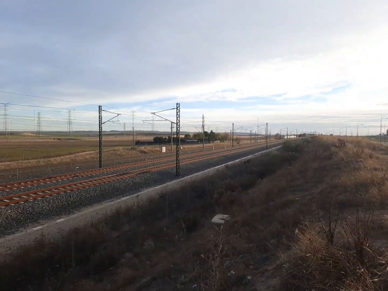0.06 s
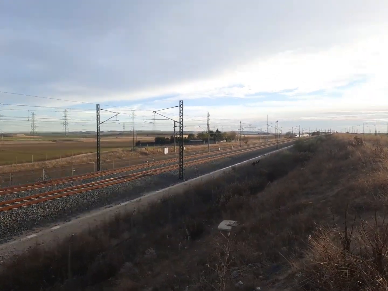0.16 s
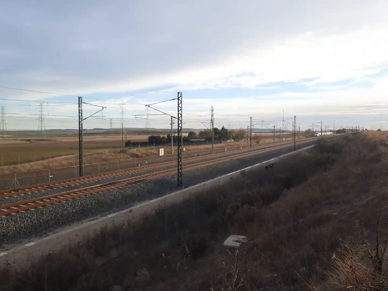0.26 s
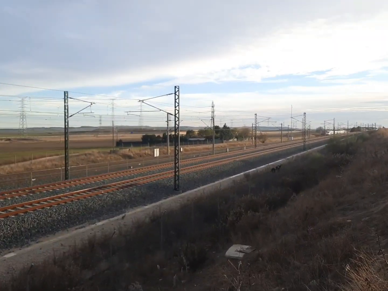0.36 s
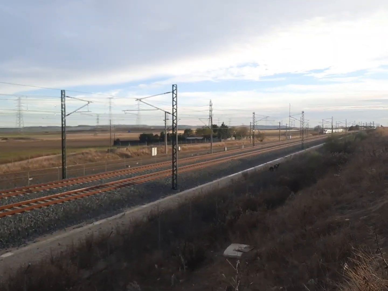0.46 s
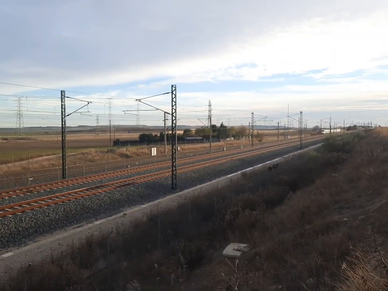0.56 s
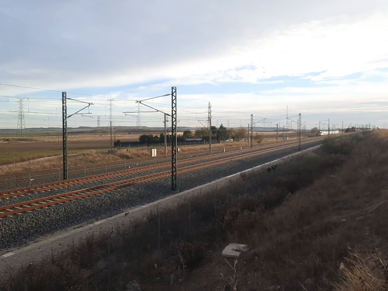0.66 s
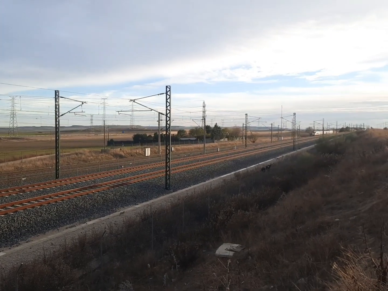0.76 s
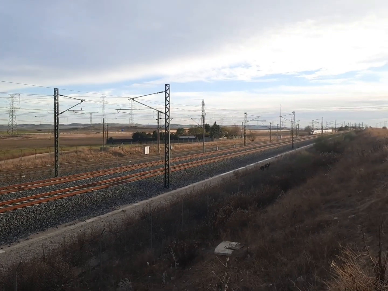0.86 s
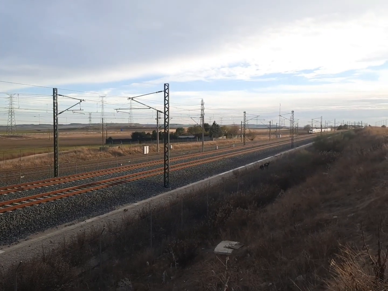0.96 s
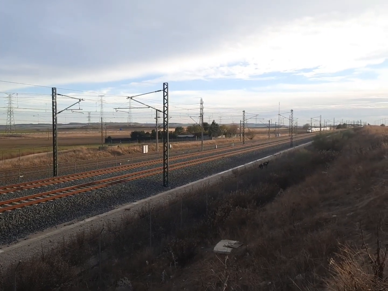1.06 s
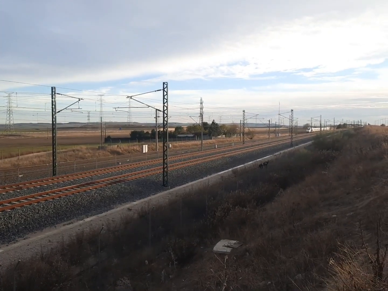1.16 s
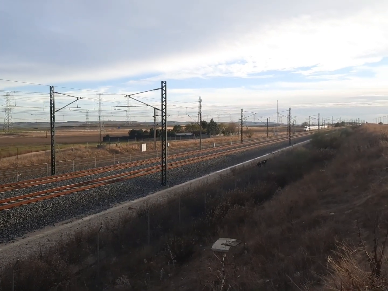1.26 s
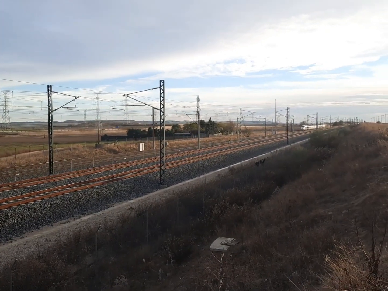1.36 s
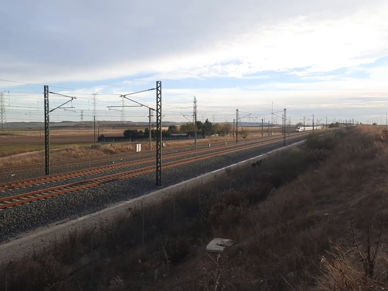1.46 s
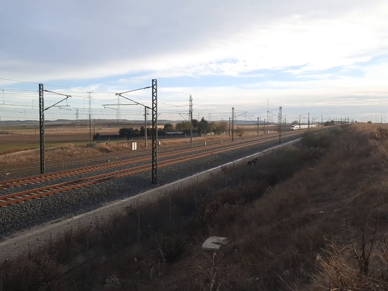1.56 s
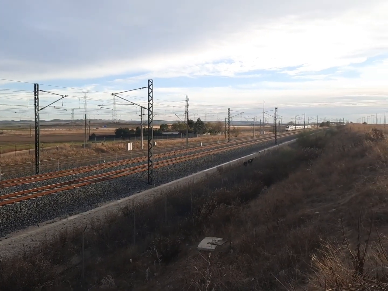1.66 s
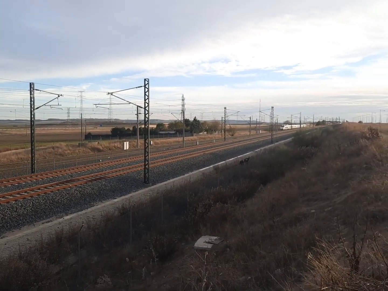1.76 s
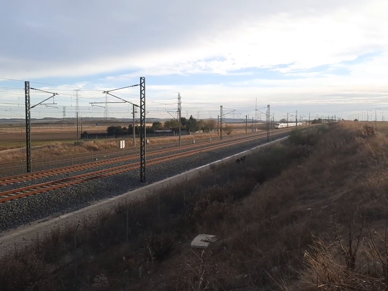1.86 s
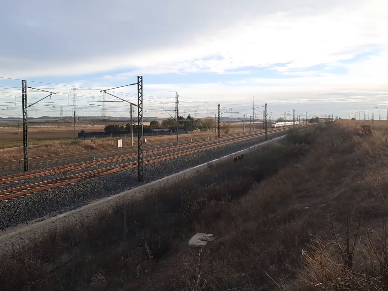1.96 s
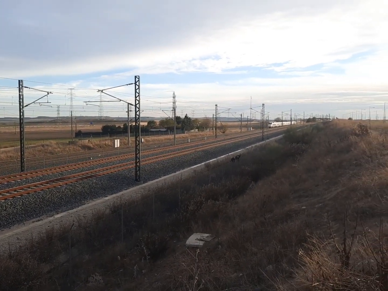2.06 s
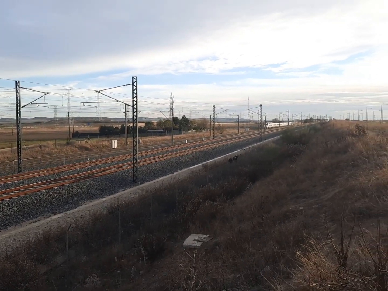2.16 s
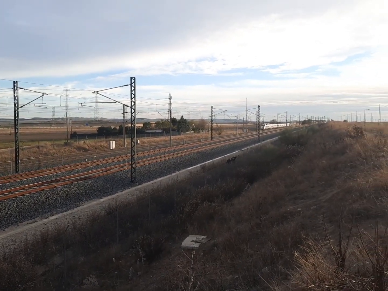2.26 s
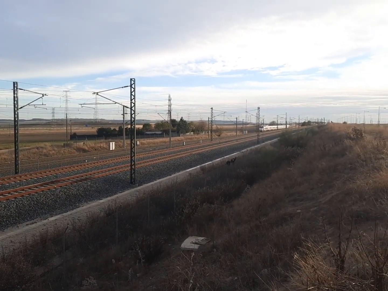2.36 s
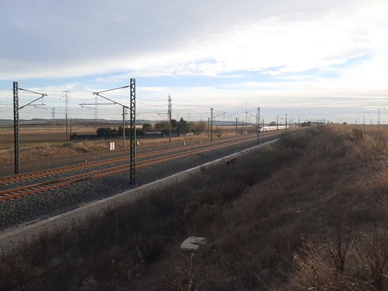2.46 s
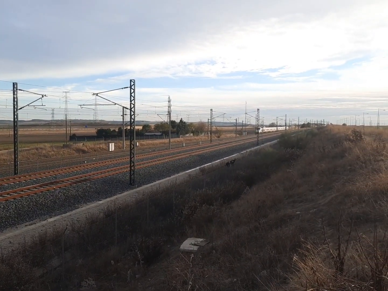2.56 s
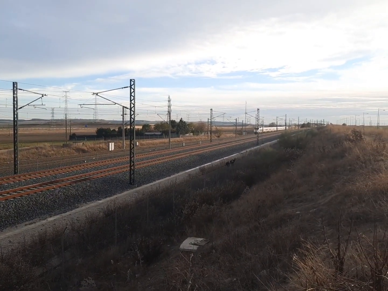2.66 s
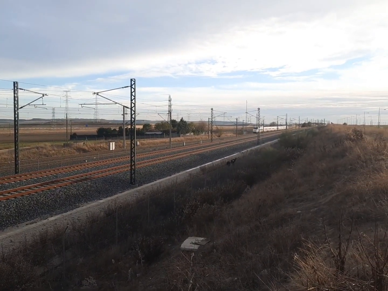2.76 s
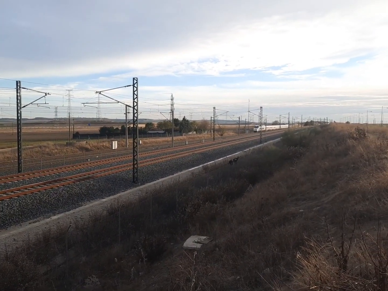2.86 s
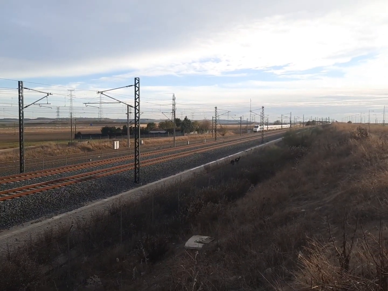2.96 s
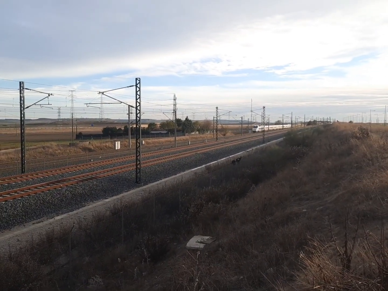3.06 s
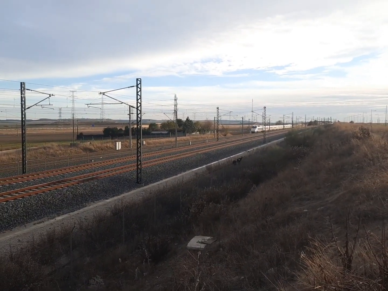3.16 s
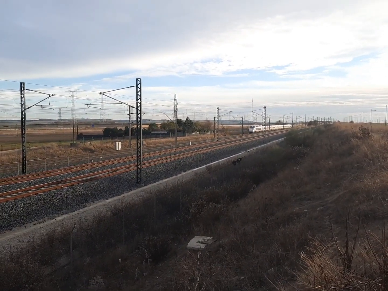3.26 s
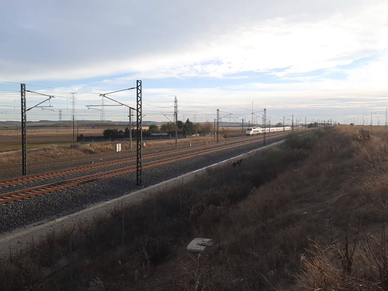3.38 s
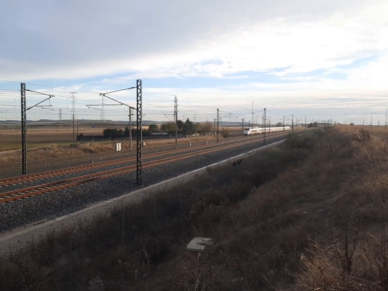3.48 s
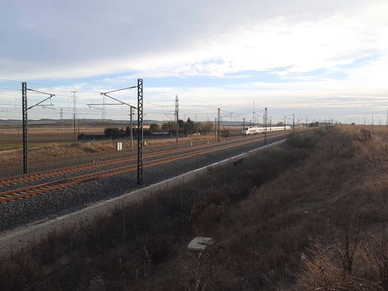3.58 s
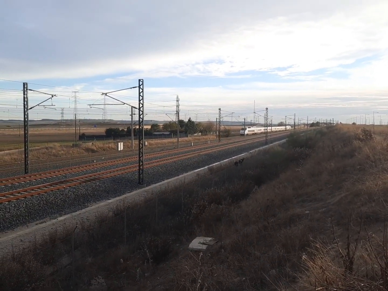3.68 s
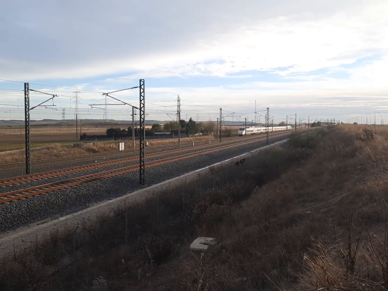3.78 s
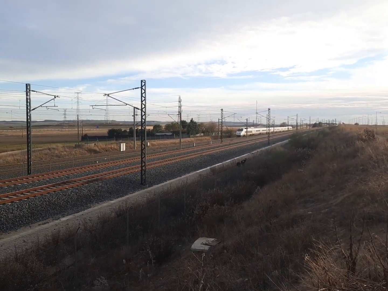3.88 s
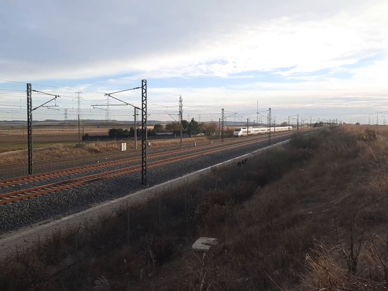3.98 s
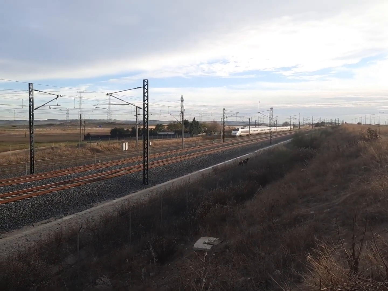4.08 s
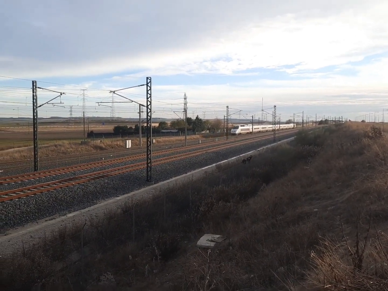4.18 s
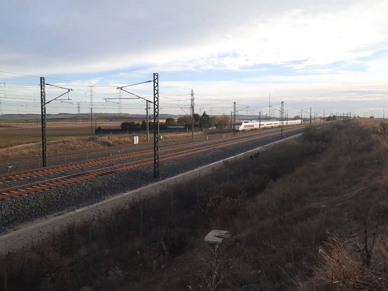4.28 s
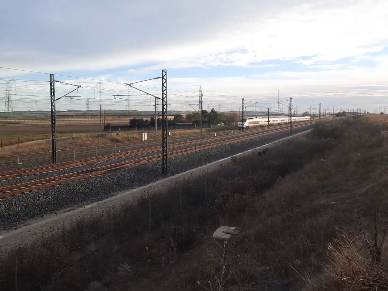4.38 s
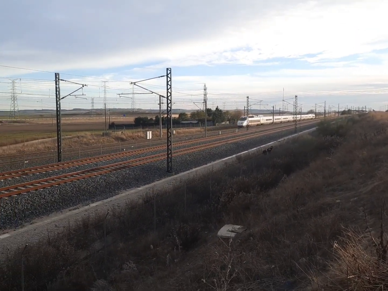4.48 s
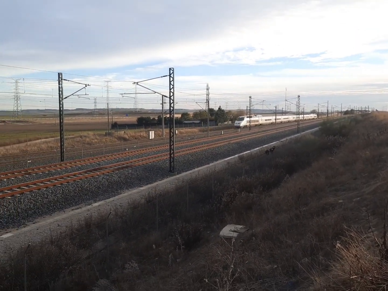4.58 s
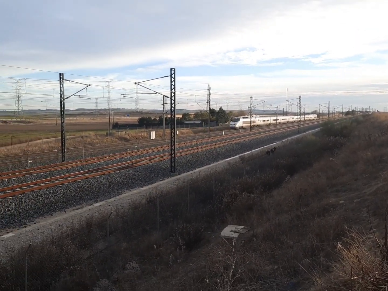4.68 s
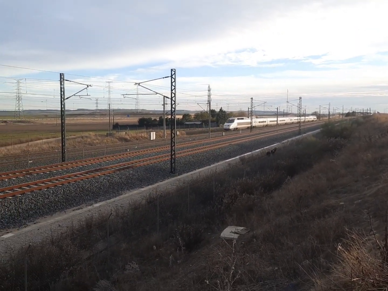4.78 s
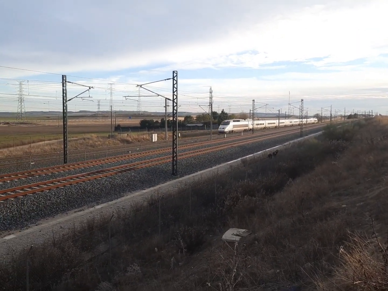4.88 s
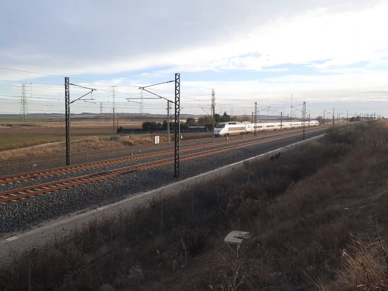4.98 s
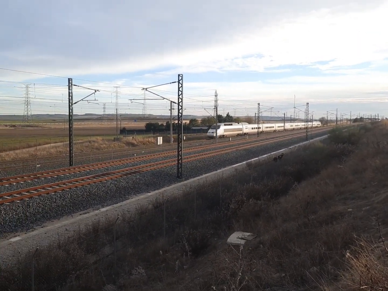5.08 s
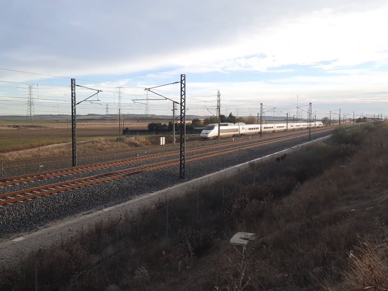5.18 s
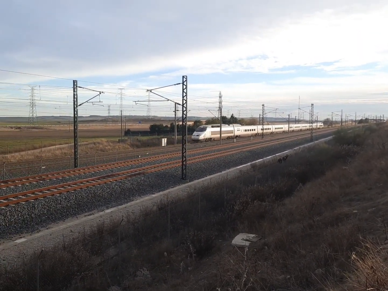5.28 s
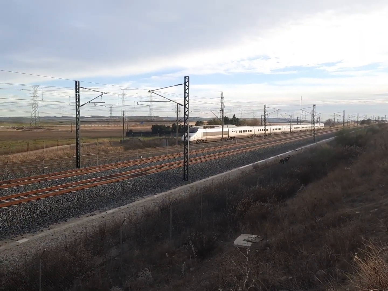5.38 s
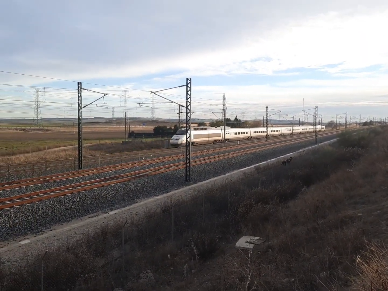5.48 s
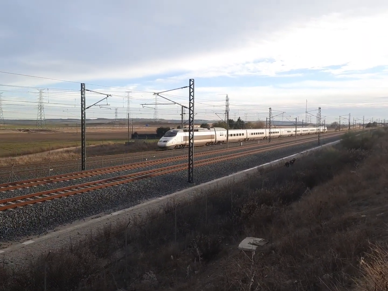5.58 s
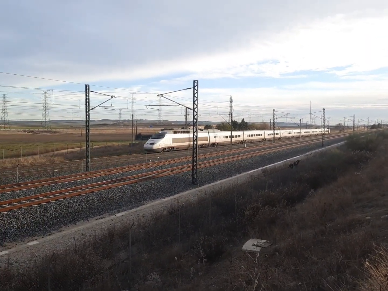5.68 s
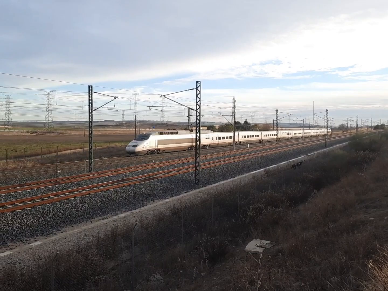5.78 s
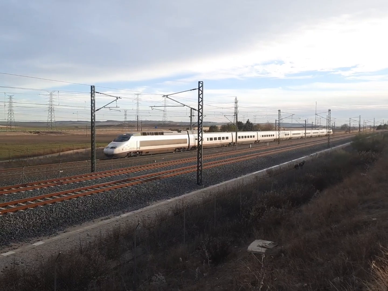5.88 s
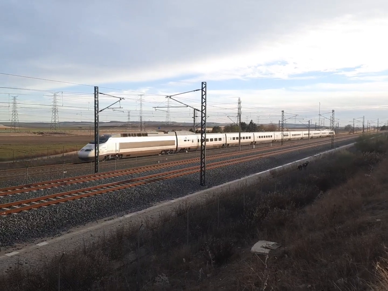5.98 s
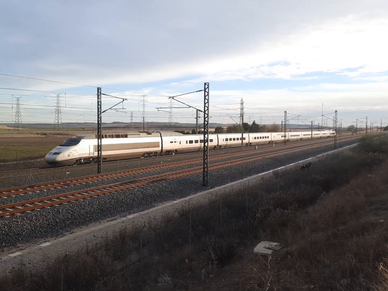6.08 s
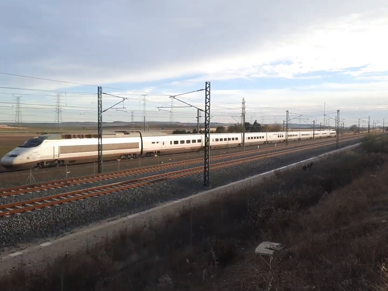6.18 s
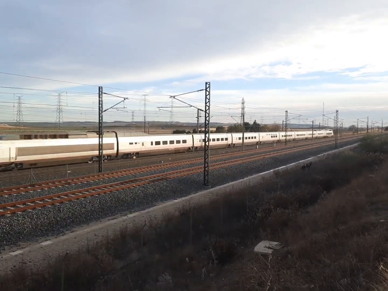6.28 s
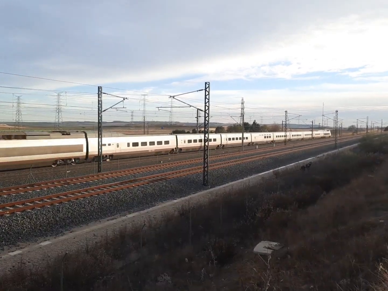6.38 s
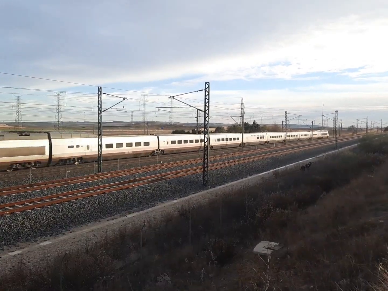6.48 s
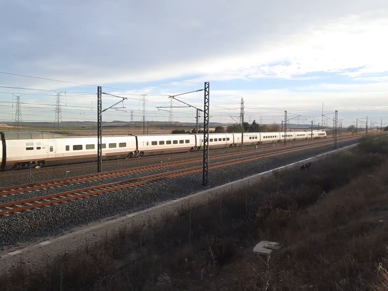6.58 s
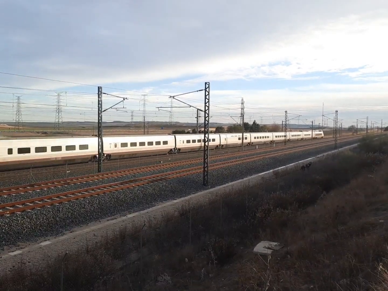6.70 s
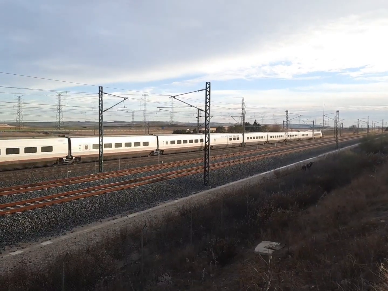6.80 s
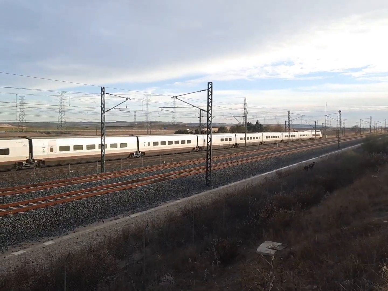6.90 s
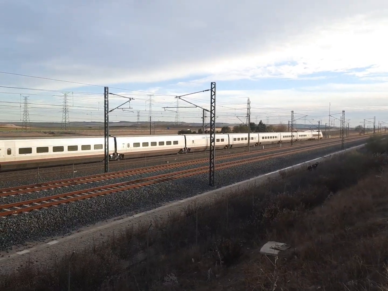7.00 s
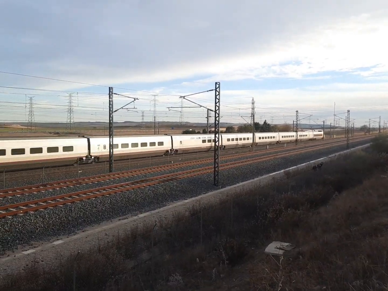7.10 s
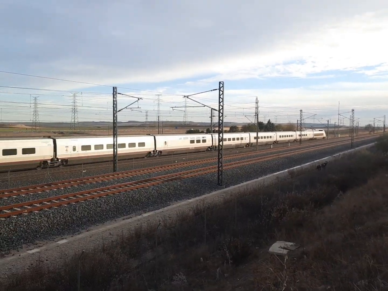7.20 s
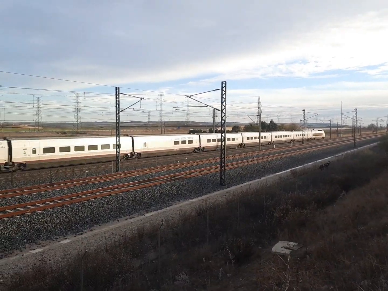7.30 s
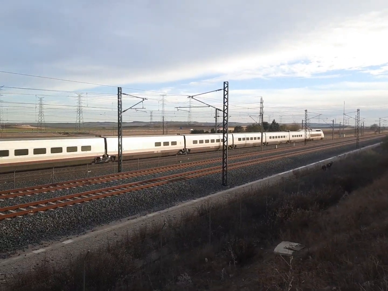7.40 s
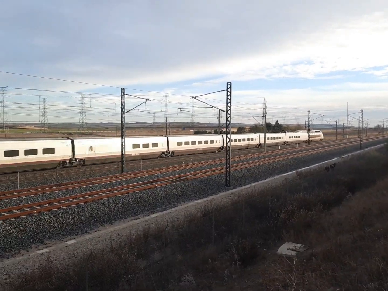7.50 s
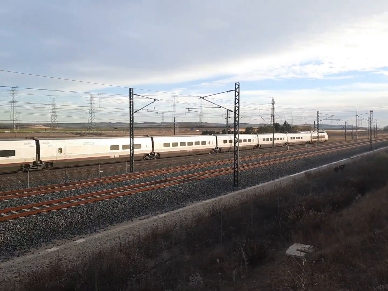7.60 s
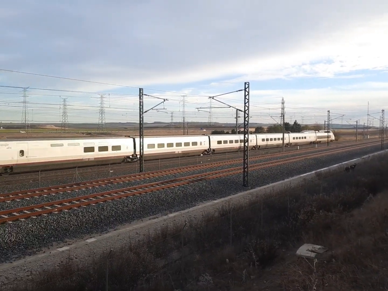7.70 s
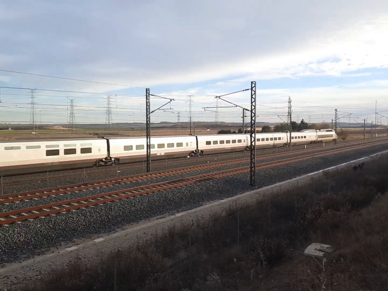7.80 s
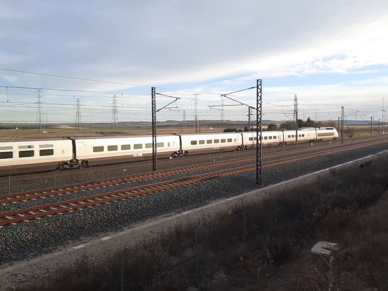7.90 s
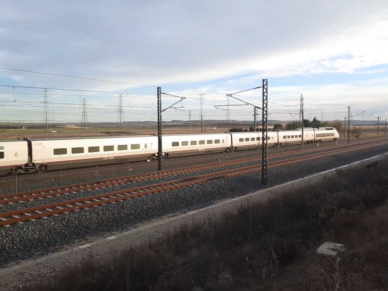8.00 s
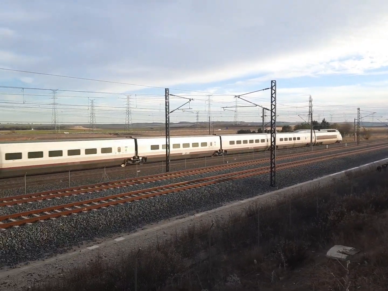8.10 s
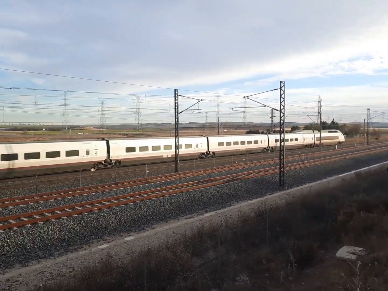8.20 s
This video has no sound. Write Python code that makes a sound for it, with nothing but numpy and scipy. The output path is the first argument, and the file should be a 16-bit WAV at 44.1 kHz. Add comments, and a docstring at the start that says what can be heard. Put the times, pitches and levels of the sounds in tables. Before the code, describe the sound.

A high-speed train approaches over quiet fields and sweeps past with rushing air, low rumble, wheel noise and falling motor whines.

```python
"""Open fields: a high-speed train comes out of the distance and runs past two microphones.
The rails sing ahead of it, then a low rumble and the rush of air round the nose swell. Wheels and
whining motors take over as it draws alongside. Far birds call in the quiet before, and the left
microphone hears the high treble best. The broad sounds are random noise, shaped by how much power
each frequency has at each moment; the motors and birds are rough, gliding tones."""
import sys
import numpy as np
from scipy import signal
from scipy.io import wavfile
from scipy.ndimage import uniform_filter1d

SR = 44100
rng = np.random.default_rng(int(sys.argv[2]) if len(sys.argv) > 2 else 0)


def wav_out(sig):
    """Save sig, one row per channel (or a flat mono array), as 16-bit PCM at SR to the path in sys.argv[1]."""
    wavfile.write(sys.argv[1], SR, np.round(np.clip(np.atleast_2d(sig).T, -1, 1) * 32767).astype(np.int16))


N = 363825

PASS_S, SPEED_M_S, TRACK_M = 6.133, 81.4, 57.5  # when the nose passes; its speed; distance to the track


def air_rush(hz, t):
    """Power of the air rushing round the nose, which gives way as the coaches come alongside."""
    # ridged where the echo off the ground cancels the sound: (frequency [Hz], relative level [dB])
    spectrum = [(80, -41), (130, -39), (225, -19), (310, -6.5), (430, -4), (540, -6), (610, -12),
                (770, -3.5), (950, -10), (1180, -10), (1420, -15), (1650, -14.5), (1780, -22.5),
                (1930, -16), (2110, -23.5), (2290, -20.5), (2480, -24.5), (2750, -22), (3600, -23),
                (5500, -34), (7000, -39), (8500, -48.5), (11000, -88)]
    loss_db_per_100m = 3.58  # at 4 kHz; far sound loses its treble on the way
    air_db = -loss_db_per_100m * SPEED_M_S * time_to_pass(t) / 100 * (hz[:, None] / 4000) ** 1.2
    level_db = approach(t, top_db=-25.5, ground_db_per_100m=3.7, fade_db_per_s=1.9) + air_db
    return shape(hz, spectrum, 500, 1500) * amp(2 * level_db) * (1 - alongside(t))


def rumble(hz, t):
    """Power of the train's low rumble, loudest as the nose passes."""
    # the rumble's tone colour: (frequency [Hz], relative level [dB])
    spectrum = [(13, -47), (22, -31), (45, -9), (58, 6), (74, 7.5), (92, -1), (108, -9), (134, -14),
                (200, -18), (260, -65), (440, -120)]
    level_db = approach(t, top_db=-22, ground_db_per_100m=2.6, fade_db_per_s=0.66)
    return shape(hz, spectrum, 35, 130) * amp(2 * level_db)


def wheels(hz, t):
    """Power of the rolling wheels, heard once they come out from behind the nose."""
    # tone colour of the passing coaches: (frequency [Hz], relative level [dB])
    spectrum = [(76, -33), (130, -7.5), (278, 1.5), (368, -3.5), (802, -11.5), (1080, -13.5), (1460, -12.5),
                (1750, -7), (2310, -7), (3250, -18.5), (4850, -25), (7380, -26), (8840, -39),
                (11500, -31.5), (15500, -56)]
    level_db = -35.5
    return shape(hz, spectrum, 2575, 6600) * amp(2 * level_db) * alongside(t)


def motors(t):
    """The front car's hum and the clear whine of its motors, both falling as it goes by."""
    # the hum: (time [s], pitch [Hz], level [dB])
    hum = [(2.65, 425, -66), (2.85, 427, -50.5), (4.1, 427, -44.5), (4.3, 426.6, -49.5), (4.9, 428.4, -39),
           (5.45, 425, -38.5), (5.6, 428, -29), (5.8, 424.5, -37.5), (6.02, 420.7, -28.5), (6.35, 410, -33),
           (6.6, 396, -41)]
    # the whine: (time [s], pitch [Hz], level [dB])
    whine = [(6.4, 2147, -49), (6.49, 2120, -23.5), (6.59, 2079, -27), (6.64, 2063, -34), (6.72, 2010, -29),
             (6.8, 1958, -31), (6.88, 1926, -24.5), (6.96, 1897, -28), (7, 1870, -38), (7.06, 1845, -29),
             (7.1, 1810, -45)]
    return glide(t, hum, width_hz=10, rough=.15) + glide(t, whine, width_hz=110, rough=.3)


def whines(t):
    """Short whines of passing motors and wheels that fall in pitch, and rough tones that hold theirs."""
    # falling whines: (start [s], length [s], first pitch [Hz], width [Hz], level [dB], noise share [0-1])
    falling = [(6.42, .36, 2100, 260, -30, .95), (6.55, .25, 1286, 90, -34, .7),
               (6.64, .24, 2375, 90, -31, .6), (6.75, .28, 1990, 330, -27, .95),
               (6.9, .45, 2108, 150, -32.5, .8), (6.95, .15, 2430, 60, -30, .3),
               (7.02, .3, 1930, 270, -23.5, .8), (7.15, .15, 2430, 120, -31, .6),
               (7.33, .16, 2420, 80, -30, .4), (7.3, .47, 1814, 120, -34.5, .8),
               (7.35, .13, 2590, 60, -33, .4), (7.58, .28, 2440, 60, -28.5, .25),
               (7.98, .12, 2410, 50, -33, .25), (7.78, .09, 2080, 60, -32, .4),
               (6.72, .25, 6300, 300, -53, .95), (8.03, .18, 6280, 300, -52, .95),
               (8.07, .14, 7600, 120, -48, .7)]
    # steady tones: (start [s], length [s], pitch [Hz], width [Hz], level [dB], noise share [0-1])
    steady = [(5.4, 1.39, 2815, 169.8, -41, 0.96), (5.85, 0.45, 2200, 30, -43, 0.5),
              (6.5, 0.94, 6160, 319, -49, 0.89), (7.85, .39, 2880, 89.3, -42, .8)]
    out = np.zeros(N)
    for rows, fall_per_s, skew in ((falling, .14, .8), (steady, 0, 1.2)):  # skew below 1 peaks early
        for start, length, hz, width_hz, db, rough in rows:
            on = (t > start) & (t < start + length)
            since = t[on] - start
            swell = np.abs(np.sin(np.pi * (since / length) ** skew)) ** 0.58
            out[on] += amp(db) * swell * tone(t[on], hz * (1 - fall_per_s * since), width_hz, rough)
    return out


def rails(hz, t):
    """Power of the rails ringing at a few high pitches, which travel along them ahead of the train."""
    # the ringing pitches: (fade-in start [s], pitch at 0 s [Hz], climb [Hz/s], width [Hz])
    rings = [(.6, 7130, 6, 90), (1.5, 7350, 12, 110), (-1, 9590, 35, 50), (2.7, 10900, 35, 150),
             (-1, 11990, 70, 80), (.75, 13180, 74, 65), (.75, 14460, 75, 50), (1.5, 2800, 0, 280),
             (-1, 12400, 40, 850)]
    # strength of each: (relative level [dB], loss along the rail [dB per s until the nose passes])
    strengths = [(-1.5, 2.5), (-3, 2.5), (-6.5, 6), (2, 9), (-3.5, -0.5), (-2, 3.5), (-18, -2), (19.5, 5),
                 (2, 1.5)]
    # rise and fall of the whole song: (time [s], level [dB])
    song = [(0, -78), (.8, -72.5), (2.1, -75.5), (2.8, -68.5), (3.4, -66), (4.5, -66), (5.1, -61.5),
            (6.4, -62.5), (6.6, -62)]
    song_db = np.interp(t, *np.transpose(song))
    power = 0
    for (start, start_hz, climb, width_hz), (db, loss) in zip(rings, strengths):
        heard = np.clip((t - start) * 10, 0, 1) * (1 - .6 * alongside(t))
        waver_db = 2 * min(1, 100 / width_hz) * wander(t, 1.5, 20)  # narrow rings waver most
        level_db = song_db + db - loss * time_to_pass(t) + waver_db
        power += resonance(hz, start_hz + climb * t, width_hz) * amp(2 * level_db) * heard
    return power


def swells(hz, t):
    """Power of gliding bands of noise that swell and fade as the train nears and sweeps by."""
    # the first row is a faint hiss near 4.5 kHz trailing the first bird call
    # the bands: (start [s], end [s], first pitch [Hz], last pitch [Hz], width [Hz], level [dB])
    bands = [(-0.15, 0.4, 4500, 3900, 300, -82), (0.1, 5.3, 2340, 2500, 340, -66.5),
             (1.1, 5.6, 3400, 2860, 96, -71), (0.81, 5.4, 800, 670, 160, -50),
             (3.5, 4.5, 5300, 4700, 1060, -66), (4.602, 6.2, 1290, 940, 203.7, -32),
             (6.5, 6.52, 1154, 1270, 75.93, -32), (5.548, 7.3, 375, 217, 59, -29),
             (5.55, 6.08, 3300, 4300, 400, -44.5), (6.14, 6.65, 3600, 4300, 690, -39),
             (5.75, 7.5, 6500, 4900, 1200, -47), (6.5, 8.1, 2180, 1940, 226, -32)]
    power = 0
    for start, end, from_hz, to_hz, width_hz, db in bands:
        progress = np.clip((t - start) / (end - start), 0, 1)
        centre_hz = from_hz + (to_hz - from_hz) * progress
        power += resonance(hz, centre_hz, width_hz) * amp(2 * db) * np.sin(np.pi * progress) ** 2
    return power


def wind(hz, t):
    """Power of the wind's low buffeting, which sways slowly in level."""
    level_db = -46 + 2 * wander(t, 0.56, 2.95)
    return resonance(hz, centre_hz=57.6, width_hz=23) * amp(2 * level_db)


def field(hz, t):
    """Power of a steady, distant wash of noise and of one brief hiss."""
    # tone colour of the wash: (frequency [Hz], relative level [dB])
    spectrum = [(100, 9.5), (150, 3.5), (230, -1), (400, -6), (800, 2), (1250, -5), (2000, -18),
                (3500, -31), (3900, -44), (6000, -42.5), (11000, -61), (15000, -40)]
    wash_db, hiss_db = -54, -73.5
    swell = np.exp(-((t - 2.17) / .13) ** 2)
    hiss = resonance(hz, centre_hz=5300, width_hz=1100) * amp(2 * hiss_db) * swell
    return shape(hz, spectrum, 130, 11000) * amp(2 * wash_db) + hiss


def birds():
    """Gliding, slightly hoarse whistles with a far echo."""
    # one bird repeats a rising chirp: (start [s], first pitch [Hz], level [dB])
    chirps = [(.02, 3270, -73), (.18, 3320, -73), (.34, 3320, -71), (.515, 3290, -70), (.59, 3300, -72),
              (.675, 3220, -67), (.785, 3350, -72), (.935, 3390, -73), (1.1, 3350, -75), (1.42, 3410, -75),
              (1.58, 3480, -75), (1.7, 3430, -79)]
    # other birds: (start [s], length [s], first pitch [Hz], glide [Hz], level [dB], bend [1 = straight])
    calls = [(.012, .048, 4560, -1150, -71, 3), (.39, .05, 3620, 260, -80, 1.4),
             (1.83, .36, 2950, -680, -66, 1.6), (2.215, .075, 4230, -300, -70, 1.4),
             (2.19, .1, 3070, -70, -67, 1.4), (2.63, .045, 3700, 900, -68, 1),
             (2.675, .04, 4600, -900, -70, 1.4)]
    chirp_s, rise_hz = .08, 190
    notes = [(start, chirp_s, hz, rise_hz, db, 1.6) for start, hz, db in chirps] + calls
    out = np.zeros(N)
    for start, length, start_hz, glide_hz, db, bend in notes:
        progress = np.linspace(0, 1, int(length * SR))
        swell = np.sqrt(np.sin(np.pi * progress ** .7))
        whistle = tone(progress * length, start_hz + glide_hz * progress ** bend, width_hz=170, rough=.45)
        out[int(start * SR):][:len(whistle)] += amp(db) * swell * whistle
    echo = rng.standard_normal(8000) * amp(-60 * np.arange(8000) / SR / .4)
    return out + 0.58 * signal.oaconvolve(out, echo / np.linalg.norm(echo))[:N]


def ticks():
    """Dry ticks close by: bursts of treble noise a few milliseconds long."""
    # the bursts: (time [s], peak before filtering [dB])
    bursts = [(0.7452, -60), (0.8999, -57), (3.1472, -61)]
    out, t = np.zeros(N), np.arange(300) / SR
    for start, db in bursts:
        burst = amp(-60 * t / .006) * rng.standard_normal(len(t))
        out[int(start * SR):][:len(t)] = amp(db) * burst / abs(burst).max()
    return signal.sosfilt(signal.butter(2, [5500, 11000], "band", fs=SR, output="sos"), out)


def time_to_pass(t):
    """Seconds until the nose passes, then zero."""
    return np.maximum(PASS_S - t, 0)


def alongside(t):
    """Rises from 0 to 1 as the wheels come out from behind the nose."""
    start_s, end_s = 6.12, 7.14
    return np.clip((t - start_s) / (end_s - start_s), 0, 1) ** 1.28


def approach(t, top_db, ground_db_per_100m, fade_db_per_s):
    """Level in dB: far sound spreads out and is lost over the ground; once past, it fades steadily."""
    extra_m = np.hypot(SPEED_M_S * time_to_pass(t), TRACK_M) - TRACK_M
    loss_db = 20 * np.log10(1 + extra_m / TRACK_M) + ground_db_per_100m * extra_m / 100
    return top_db - loss_db - fade_db_per_s * np.maximum(t - PASS_S, 0)


def amp(db):
    """Turns decibels into a gain; amp(2 * db) gives power instead."""
    return 10 ** (np.asarray(db) / 20)


def read(hz, points, column=1):
    """Looks up a table's column at each frequency, blending between rows."""
    table = np.transpose(points)
    return np.interp(np.log(hz + 1), np.log(table[0] + 1), table[column])[:, None]


def shape(hz, points, lo_hz, hi_hz):
    """Power at each frequency, scaled so that the noise between lo_hz and hi_hz has power 1."""
    power = amp(2 * read(hz, points))
    return power * len(hz) / power[(hz > lo_hz) & (hz < hi_hz)].sum()


def resonance(hz, centre_hz, width_hz):
    """Power of noise ringing round one pitch, 1 in all."""
    power = 1 / (1 + ((hz[:, None] - centre_hz) / width_hz) ** 2) ** 2
    return power * SR / (np.pi * width_hz)


def wander(t, slow_hz, fast_hz):
    """A smooth random wobble with a typical size of 1."""
    rates = np.geomspace(slow_hz, fast_hz, 16)[:, None]
    waves = np.sin(2 * np.pi * (rates * t + rng.random((16, 1))))
    return waves.sum(0) / np.sqrt(8)


def tone(t, hz, width_hz, rough):
    """A pure tone blurred by a crowd of nearby pitches; rough (0-1) is their share of the power."""
    offset, phase = rng.random((2, 16, 1))
    crowd = np.exp(2j * np.pi * ((offset - .5) * width_hz * t + phase)).sum(0) / np.sqrt(8)
    pure = np.exp(2j * np.pi * np.cumsum(hz) / SR)
    return ((np.sqrt(2 - 2 * rough) + np.sqrt(rough) * crowd) * pure).real


def glide(t, curve, width_hz, rough):
    """A tone that follows a curve of pitch and level and is silent outside it."""
    times, hz, db = np.transpose(curve)
    return amp(np.interp(t, times, db, -200, -200)) * tone(t, np.interp(t, times, hz), width_hz, rough)


def microphones(hz, t, noise, other_noise, tones):
    """Left and right spectra, which differ in level, timing and likeness as the train goes by."""
    # the pair's basic response: (frequency [Hz], left over right [dB], likeness of the two [0-1])
    pair = [(60, -1, 0.99), (300, 1.5, 0.94), (553, 3.5, 0.96), (920, 4.5, 0.8), (1550, 11, 0.56),
            (2420, -4.5, 0.66), (3020, 4, 0.51), (3840, 5, 0.42), (5300, -10.5, 0.22), (6800, 5, 0.094),
            (7150, 23, .2), (9000, 20, .1), (11000, 24, .15), (12400, 19, .25), (14500, 8, .25)]
    # the train's direction: (time [s], delay of the left side's treble behind the right [ms])
    delays = [(0, 0.2), (3.5, 0.044), (5.2, 0.04), (6.3, -0.13), (6.7, -0.607), (8.25, -0.6)]
    # low notes bend round the microphones' housing with less delay: (frequency [Hz], share [0-1])
    delay_share = [(100, 0.66), (2330, 0.87), (3800, 1)]
    swing_s = (6.13, 7.03)  # the sound swings from ahead to the side
    low_db = read(hz, pair) * np.interp(t, swing_s, (0.93, 0.14))
    high_db = read(hz, pair) + np.interp(t, (2.9, 6), (5, 0))  # more while the rails outsing the train
    right_gain = amp(-np.where(hz[:, None] < 7000, low_db, high_db))
    likeness = read(hz, pair, column=2) ** np.interp(t, swing_s, (1, 1.5))
    delay_s = read(hz, delay_share) * np.interp(t, *np.transpose(delays)) / 1000
    shift = np.exp(2j * np.pi * hz[:, None] * delay_s)
    left = noise + tones
    right = right_gain * shift * (likeness * noise + np.sqrt(1 - likeness ** 2) * other_noise + tones)
    # keeps the noise's level in the average of the two sides
    balance = 2 / np.sqrt(1 + right_gain ** 2 + 2 * likeness * right_gain * shift.real)
    return balance * np.array([left, right])


def scene():
    """Shapes white noise with the summed powers, then adds the tones, birds and ticks in stereo."""
    seconds = np.arange(N) / SR
    frames = dict(fs=SR, nperseg=2048, noverlap=1536)
    sources = np.vstack([rng.standard_normal((2, N)), motors(seconds) + whines(seconds)])
    hz, t, (noise, other_noise, tones) = signal.stft(sources, **frames)
    patches = uniform_filter1d(rng.standard_normal(noise.shape), size=20, axis=0)
    patches = uniform_filter1d(patches, size=8, axis=1)
    background = wind(hz, t) + field(hz, t)
    train = air_rush(hz, t) + rumble(hz, t) + wheels(hz, t) + rails(hz, t)
    power = train + swells(hz, t) + background
    gain = np.sqrt(power) * amp(1.04 * patches / patches.std())  # uneven by about 1 dB
    spectra = microphones(hz, t, gain * noise, gain * other_noise, tones)
    stereo = signal.istft(spectra, **frames)[1][:, :N]
    treble = signal.sosfiltfilt(signal.butter(4, 7000, "high", fs=SR, output="sos"), stereo)
    flicker = amp(0.9 * wander(seconds, 2.3, 80)) - 1  # the high treble flickers as a whole
    return stereo + flicker * treble + birds() * amp([[1.5], [-1.5]]) + ticks() * amp([[5], [-8]])


def record(dry):
    """The microphones cut the deepest bass, add a faint hiss and lose the highest treble."""
    cut = signal.sosfilt(signal.butter(4, 36, "high", fs=SR, output="sos"), dry)
    hiss = amp(-85) * rng.standard_normal(dry.shape)
    low_pass = signal.firwin(511, 15550, window=("kaiser", 9), fs=SR)
    return signal.oaconvolve(cut + hiss, low_pass[None], "same")


dry = scene()
out = record(dry)
wav_out(out)
```